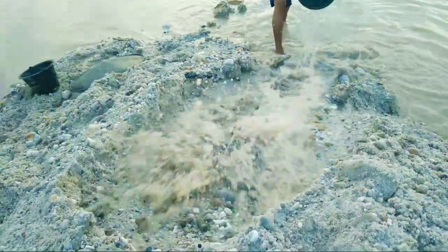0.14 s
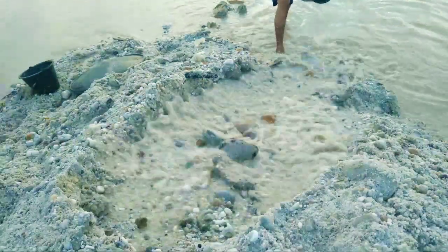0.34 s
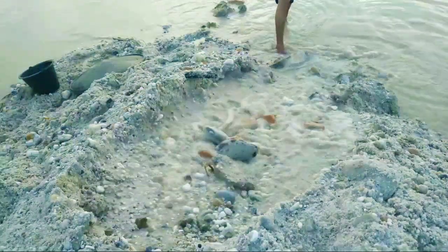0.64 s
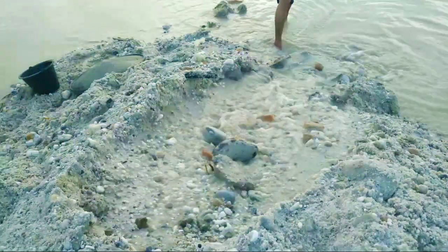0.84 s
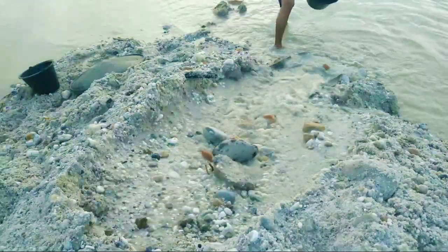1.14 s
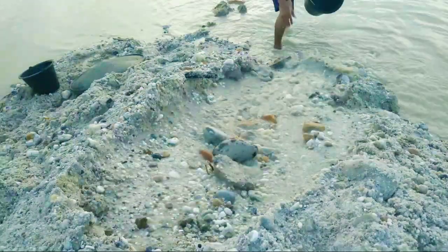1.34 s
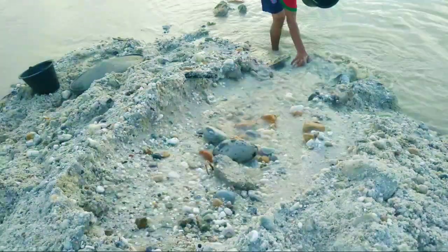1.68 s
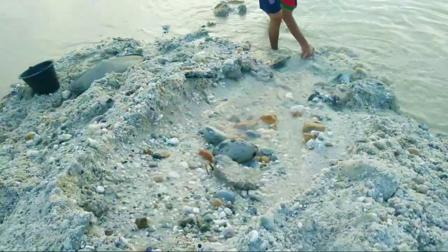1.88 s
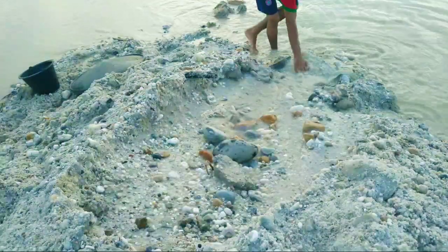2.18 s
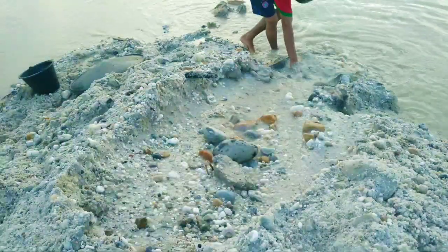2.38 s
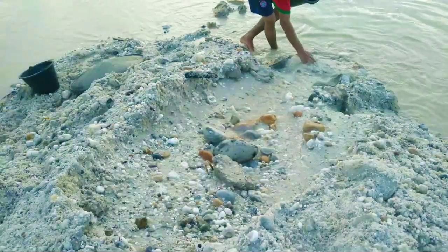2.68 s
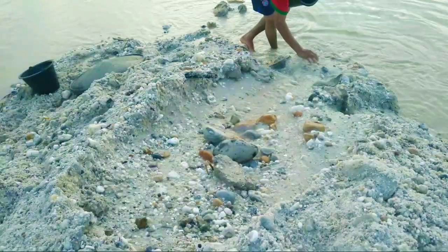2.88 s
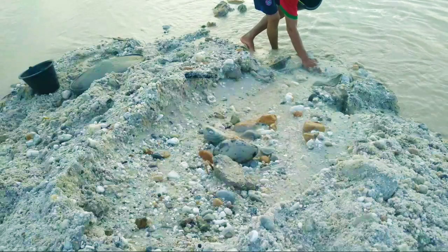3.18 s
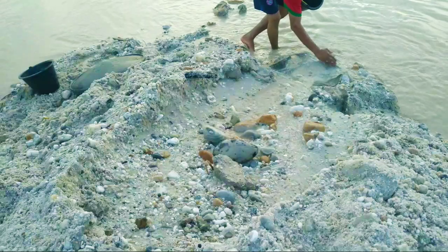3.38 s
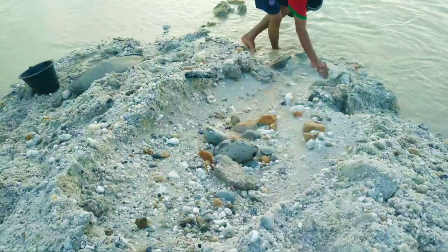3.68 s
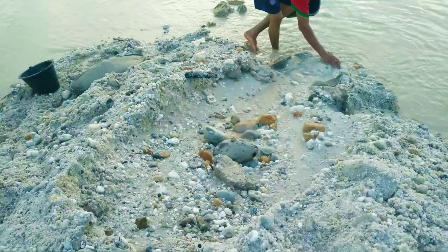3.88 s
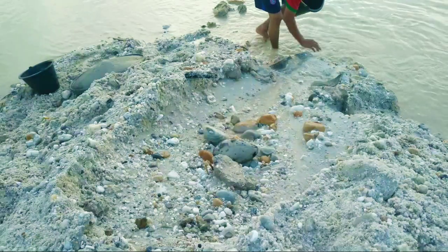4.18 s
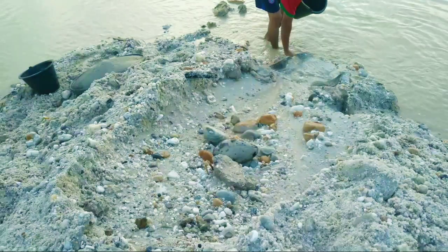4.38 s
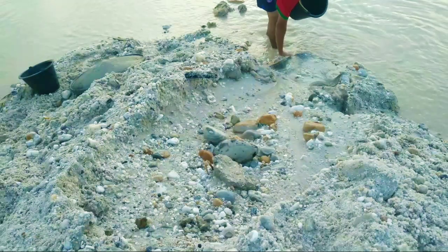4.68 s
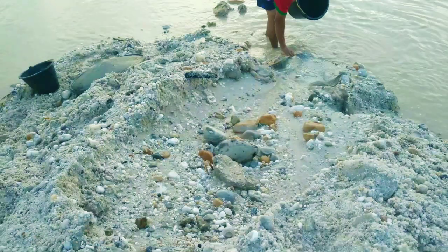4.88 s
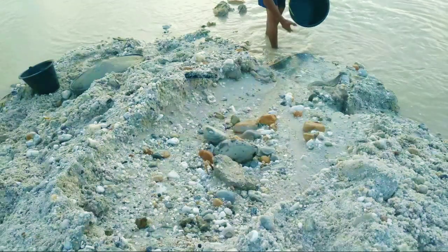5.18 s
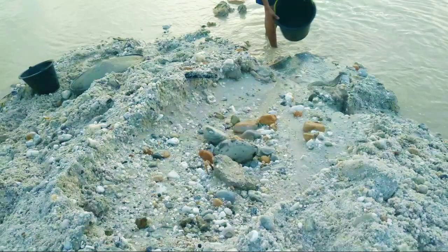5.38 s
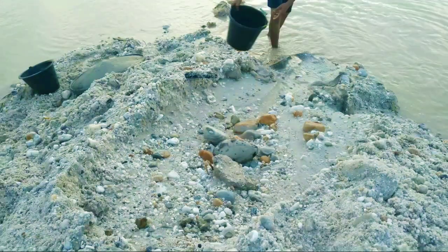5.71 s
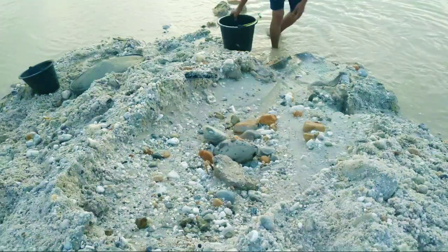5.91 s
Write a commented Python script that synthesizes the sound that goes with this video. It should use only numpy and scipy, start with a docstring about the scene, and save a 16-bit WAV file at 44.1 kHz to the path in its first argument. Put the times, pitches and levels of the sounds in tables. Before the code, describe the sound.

Loud splash on a stony bank, fizzing drainage, bubbling plops and scraped wet grit, a far engine throbbing, then an empty bucket thumping.

```python
"""A bucket of water lands on a gravel bank and drains away: noise bursts, pings and ringing bubbles.
A hand sloshes in the shallows and sweeps wet grit, heard as filtered showers of random impacts.
At the end the empty plastic bucket knocks about, its floor thudding and its wall modes ringing.
Far off, a one-cylinder engine throbs, each firing exciting the exhaust resonances.
Behind all lie open-air rumble, a thin hiss and a high trill, all made from filtered noise."""
import sys
import numpy as np
from scipy import signal
from scipy.fft import rfft, irfft
from scipy.io import wavfile

SR = 44100
rng = np.random.default_rng(int(sys.argv[2]) if len(sys.argv) > 2 else 0)


def to_wav(s):
    """Save 16-bit WAV."""
    ch = np.atleast_2d(s).T  # columns
    pcm = np.round(np.clip(ch, -1, 1) * 32767)  # PCM
    wavfile.write(sys.argv[1], SR, pcm.astype(np.int16))


N = 266804

# Levels are relative; each source sets its own gain. Spectra are (f/Hz, power density level/dB).
# thrown water, the whole sheet and then stray slops: (t/s, spray hold/s, spray level/dB, weight level/dB)
THROWS = [(0, 0.12, -23.3, -23.5), (.014, .003, -32, -28.5), (.072, .02, -36, -33),
          (0.199, 0.0043, -32, -44), (0.274, 0.03, -46, -42)]
# rise time, then the time constants of spray and weight
LAND_S, SPRAY_FALL_S, WEIGHT_FALL_S = 0.0022, 0.06, 0.062
# spectrum of the spray: (f/Hz, level/dB)
SPRAY_SPECTRUM = [(2060, -50), (3500, -24), (4840, -18), (5290, -9.5), (6700, -8), (8470, -3),
                  (11900, -15.5), (14600, -17.5), (15500, -23), (16000, -31.5)]
# spectrum of water slapping stone: (f/Hz, level/dB)
SLAP_SPECTRUM = [(200, -14), (450, -12), (900, -4), (1400, -4), (2200, -6), (3200, -8), (4500, -8),
                 (7000, -41.5)]

# fizz of water draining through the stones: (start t/s, rise/s, hold/s, level/dB, fall time constant/s)
SEEPAGE = (0.15, 0.01, 2.18, -55.5, 0.53)
# trickle back into the shallows: (start t/s, rise/s, hold/s, level/dB, fall time constant/s)
RUNOFF = (0.36, 0.1, 0.3, -59, 1.25)
# legs and hand stir the shallows: (start t/s, rise/s, level/dB, fall time constant/s)
SLOSHES = [(.56, .015, -56, .06), (.875, .015, -55, 0.04), (1.3, 0.14, -41, 0.06),
           (1.555, 0.08, -37.5, 0.08), (1.69, .03, -45, .13), (1.82, .03, -50, .05), (1.94, .02, -51, .06),
           (2.032, 0.038, -52.5, 0.08), (2.47, .02, -60, .12), (2.79, 0.045, -55, 0.062),
           (3.705, 0.029, -56.5, 0.033)]
# spectrum of the fizz: (f/Hz, level/dB)
FIZZ_SPECTRUM = [(1180, -11), (2000, -5), (2440, -8), (4820, -10), (5580, -6.5), (6250, -6.5), (8330, 0.5),
                 (9090, -5), (11300, -10.5), (14900, -19), (16000, -21)]
# spectrum of the lapping: (f/Hz, level/dB)
LAPPING_SPECTRUM = [(250, -12), (470, -3), (650, -4.5), (920, 4), (1300, -4.5), (1900, -6), (3000, -18),
                    (4500, -24)]
# single large bubbles: (t/s, level/dB, f/Hz)
BUBBLES = [(.017, -22, 1000), (.06, -29, 770), (.109, -34, 500), (.206, -32, 940), (.233, -38, 900),
           (.245, -39, 1650), (.246, -40, 500), (.277, -36, 810), (.285, -38, 1050), (.372, -45, 1250),
           (.392, -44, 866), (.455, -44, 1000), (.502, -40, 873), (0.554, -48, 486), (.573, -46, 1610),
           (.79, -43, 1880), (.885, -46, 950), (.912, -47, 800), (1.265, -45, 1260), (1.32, -46, 800),
           (1.337, -46, 1370), (1.356, -40, 824), (1.402, -38, 590), (1.427, -29.5, 885), (1.441, -35, 900),
           (1.456, -38, 1200), (1.484, -38, 1250), (1.572, -41, 920), (1.582, -34, 630), (1.603, -36, 900),
           (1.617, -37, 590), (1.632, -24, 940), (1.654, -34, 710), (1.69, -35, 955), (1.709, -38, 1100),
           (1.749, -39, 900), (1.757, -40, 740), (1.772, -40, 1010), (1.793, -37, 900), (1.81, -41, 700),
           (1.835, -40, 720), (1.85, -37, 799), (1.866, -39, 860), (1.943, -39, 1610), (1.957, -39, 810),
           (2.193, -33, 840), (2.211, -28.5, 904), (2.219, -35, 1080), (2.257, -39, 1065),
           (2.476, -44, 896), (2.686, -40.5, 840), (2.788, -49, 1740), (2.84, -46, 590), (2.87, -50.5, 876),
           (2.922, -51, 1090), (3.013, -49, 1600), (3.397, -35.5, 2330), (3.724, -47, 610),
           (3.748, -51, 660), (3.745, -50, 1450), (3.847, -45, 1300), (3.854, -40, 1980), (3.92, -45, 2300),
           (4.32, -56.5, 1190), (5.908, -42, 1780), (5.922, -45, 800)]
BUBBLE_CYCLES = 40  # a large bubble's decay reaches -60 dB in this many cycles of its starting pitch

# sweeps through wet grit: (t/s, level/dB, rise/s, fall time constant/s,
# wet body level/dB and coarse sand level/dB, both relative to the fine grit)
SWEEPS = [(.314, -43.5, .013, 0.014, -22, 5.5), (1.448, -43.5, .015, 0.047, -2.5, 4),
          (1.629, -43, 0.0037, 0.014, 0, 0.5), (1.705, -51, .005, 0.074, 2, 2.5),
          (1.817, -46.5, 0.0099, 0.012, -32, 5.5), (1.923, -54, .004, 0.013, 3.5, 8),
          (2.028, -36.3, 0.007, 0.038, -25, -24), (2.496, -58, 0.0084, 0.0071, -25, 8),
          (2.732, -51.5, 0.0031, 0.047, -13, -9), (2.806, -56, 0.022, 0.018, -11, 12.5),
          (2.983, -58, 0.011, 0.037, -2.5, 0), (3.241, -50, .003, .044, -35, -5),
          (3.328, -61.5, 0.0076, 0.03, 4, 3), (3.351, -43.5, .015, 0.022, -9.5, 1.5),
          (3.389, -40, 0.0044, 0.039, -18, -4), (3.648, -57.5, 0.0067, 0.022, -12, -5),
          (3.709, -71.5, 0.023, 0.053, 11, -4), (3.8, -60, .005, .03, 0, 0),
          (3.829, -42, 0.03, 0.045, -13, -2), (3.882, -43, 0.011, 0.045, -29, -5),
          (4.159, -61.5, 0.0036, 0.033, -2, -1), (4.519, -58.5, .006, .02, -13, 3),
          (4.54, -43.5, .008, 0.032, -17, -16), (5.537, -65, 0.012, 0.016, 11, 1),
          (5.69, -50, .025, .025, -22, -12), (5.783, -44, 0.0045, 0.05, -6.5, -6.5),
          (5.904, -59, .004, 0.024, 7, -23), (5.929, -43, 0.012, 0.045, -13, -11)]
# spectrum of fine grit: (f/Hz, level/dB)
GRIT_SPECTRUM = [(1500, -34), (3000, -19.5), (4500, -15), (5800, -7), (7200, -1), (8500, 10.5),
                 (9700, -3.5), (12000, -14.5), (16000, -25)]
# spectrum of coarse sand: (f/Hz, level/dB)
SAND_SPECTRUM = [(2500, -32), (4600, -13.5), (5400, 0.5), (6500, -1.5), (7500, 3), (9500, -37.5)]
# spectrum of water among the grains: (f/Hz, level/dB)
WET_SPECTRUM = [(300, -30.5), (600, -3.5), (1100, -1), (1700, -0.5), (2400, 1), (3800, -5.5), (6000, -20)]
# sharp ticks of pebbles, heavy drops and, at the end, the bucket:
# (t/s, level/dB, low crack level/dB relative to the tick, ring f/Hz)
CLICKS = [(0.0165, -12, 5, 2900), (0.023, -13, -1, 5500), (.045, -19, -5, 2400), (.0615, -13, -12, 7000),
          (0.1372, -6, -20, 5800), (.1865, -14, -18, 7400), (.206, -23, 0, 5200), (0.264, -22, -25, 6900),
          (.328, -28, -25, 6600), (.354, -28, -22, 9500), (.29, -31, -4, 4300), (.528, -34, -7.5, 8000),
          (.873, -38, -15, 8000), (1.4544, -27, -20, 7000), (1.4753, -29, -8, 6200), (1.488, -30, -6, 7000),
          (1.606, -36, 4, 5000), (1.6315, -25, 0, 6300), (1.686, -32, -15, 7800), (1.71, -29, -15, 7500),
          (1.821, -30, -25, 7000), (2.0355, -25, -30, 8800), (2.089, -30, -25, 8800),
          (2.229, -33, -21, 8200), (2.311, -35, -24, 7000), (2.392, -40, -26, 8000),
          (2.478, -38, -12, 6000), (2.504, -36, -20, 5800), (2.733, -34, -15, 8500),
          (2.743, -37, -20, 9000), (2.811, -34, -10, 6000), (2.831, -30, -25, 6300),
          (2.861, -37, -20, 7200), (2.987, -40, -12, 4660), (3.0225, -25, -26, 8500),
          (3.2435, -28, -30, 8300), (3.316, -38, -20, 8200), (3.364, -29, -10, 5800),
          (3.395, -26, -25, 7300), (3.403, -24, -25, 6800), (3.442, -31, -22, 8400),
          (3.482, -36, -22, 8300), (3.536, -41, -20, 8600), (3.652, -46, -15, 8200), (3.85, -23, -18, 7200),
          (3.899, -25, -25, 9000), (3.936, -28, -22, 7600), (4.132, -49, -12, 7500), (4.52, -44, -12, 6500),
          (4.545, -33, -20, 7800), (4.743, -44.5, -15, 8000), (5.646, -16, -12, 8300),
          (5.737, -19, -20, 9200), (5.794, -30, -25, 8500), (5.831, -28, -20, 8400),
          (5.937, -28, -25, 9000), (5.948, -25, -15, 6000), (5.98, -30, -25, 8600)]

# bucket knocks: (t/s, thud level/dB, thud f/Hz, wall ring level/dB, favoured wall f/Hz, crack level/dB)
KNOCKS = [(5.541, -62, 330, -41, 1300, -66), (5.553, -60, 330, -41, 1300, -66),
          (5.635, -22, 410, -19, 1100, -33), (5.6365, -40, 400, -17, 2050, -33),
          (5.6395, -18, 340, -24, 900, -40), (5.646, -30, 310, -19, 3600, -30),
          (5.648, -27, 300, -16, 1000, -36), (5.654, -26, 300, -19, 1100, -42),
          (5.7286, -10, 352, -15, 2050, -42), (5.7295, -40, 350, -16, 1200, -44),
          (5.7387, -10.5, 342, -12.5, 1330, -35), (5.7493, -19, 335, -18, 1400, -34),
          (5.753, -35, 335, -21, 1400, -37), (5.7597, -17, 315, -15, 1850, -35),
          (5.7629, -14.5, 315, -32, 1240, -37), (5.776, -34, 300, -38, 1240, -43),
          (5.79, -30, 283, -42, 700, -50), (5.815, -38, 300, -36, 1450, -55),
          (5.826, -33, 310, -39, 1400, -55), (5.852, -38, 347, -44, 1400, -62)]
# wall modes of the bucket: (f/Hz, level/dB, t60/s)
WALL_MODES = [(505, -10, .05), (634, -15, .05), (710, -12, 0.053), (877, -11, .05), (1040, -6, 0.04),
              (1240, -9, 0.043), (1325, -7, .035), (1445, -8, 0.04), (1600, -10, 0.024), (1860, -9, .022),
              (2050, -7, 0.022), (2850, -13, 0.02), (3250, -16, .02), (3600, -14, .022), (4200, -19, .022)]
# spectrum of grit against the bucket: (f/Hz, level/dB)
CRACK_SPECTRUM = [(200, -6), (600, 0), (1400, 3), (2400, -3), (3200, -1), (4000, 0), (6000, -6), (8500, 2),
                  (10500, -8.5), (16000, -24)]
# spectrum of the hollow's shudder: (f/Hz, level/dB)
HOLLOW_SPECTRUM = [(120, -25), (220, -17), (295, 0), (370, -8), (520, -24.5), (1200, -43), (3000, -56.5)]
# the wire handle clinks in its lugs: (t/s, level/dB, f/Hz)
HANDLE_CLINKS = [(5.744, -40, 5600), (5.7445, -36, 3950), (5.758, -40, 3950), (5.7665, -30, 4830),
                 (5.7825, -40, 3970)]

# engine speed: (t/s, firings per s)
ENGINE_SPEED = [(0.0, 24.59), (0.09, 26.73), (0.439, 19.64), (0.802, 24.72), (1.042, 20.66), (1.315, 15.38),
                (1.836, 18.24), (2.026, 21.79), (2.339, 17.0), (2.497, 22.49), (2.685, 26.0),
                (2.974, 19.26), (3.261, 28.35), (3.556, 20.57), (3.794, 16.79), (4.075, 24.84),
                (4.388, 26.07), (5.071, 23.59), (5.261, 19.59), (6.05, 14.25)]
# the throttle opens: (start t/s, length/s, boom level/dB, its change/(dB/s),
# bark level/dB relative to the boom, its change/(dB/s), closing time constant/s)
SURGES = [(-.04, 0.29, -39, -6, -8, -12, .05), (0.462, 0.18, -36.5, 22, -12.5, 0, .05),
          (0.673, 0.24, -35.5, -21, -12, 0, .05), (1.437, 0.63, -42, 5.5, -11, 6, .04),
          (2.344, 0.2, -38, 15, -11, 0, .045), (2.586, 0.2, -35, -16, -9, 14, .05),
          (2.979, .12, -39, 55, -13, -10, .04), (3.11, 0.16, -34.5, -36, -11, 35, .085),
          (3.775, .13, -37, 16, -12, 10, .04), (3.93, .48, -42, 9, -9.5, -2, .05),
          (4.397, 0.71, -37.7, -14, -9, -5, .04), (5.186, 0.07, -41, 0, -10, 0, .05),
          (5.5, .05, -45, 0, -15, 0, .04)]
# deep exhaust resonances: (f/Hz at cruising speed, level/dB, t60/s, rise time constant/s)
BOOM_MODES = [(55, -28, 0.27, 0.023), (121, -5, 0.028, 0.0036), (149.9, -2.4, 0.185, 0.0055)]
# exhaust resonances that load brings out: (f/Hz at cruising speed, level/dB, t60/s, rise time constant/s)
BARK_MODES = [(265.7, 0, 0.055, 0.0042), (292.3, 4.5, 0.066, 0.011), (380, -17, 0.059, 0.003)]
# spectrum of rough flow from the exhaust: (f/Hz, level/dB)
FLOW_SPECTRUM = [(20, -27), (38, -20), (54, -2), (75, -16), (120, -16), (200, -7), (300, -8), (400, -20),
                 (800, -59)]
# the hum drifts between the ears: (t/s, left minus right level/dB, left delay/ms)
ENGINE_PAN = [(0, 1, -.1), (1.5, -4.5, -.13), (1.95, 2.5, -.13), (3.6, .5, -.1), (4.45, 5, .38),
              (5.3, -1, .36), (6.05, 0, 0)]
IDLE_DB, IDLE_BARK_DB = -51.5, -14.5  # boom with the throttle shut, and the bark relative to it
IDLE_PER_S, COAST_DB = 18.9, 0.58  # reference speed; boom change in dB per (firing per s) away from it
OPEN_S = 0.041  # rise time of a throttle opening
FIRST_TURN = .713  # part of the firing cycle already past at the start

# spectrum of the thin hiss: (f/Hz, level/dB)
HISS_SPECTRUM = [(260, -38.5), (450, -0.5), (515, -19.5), (694, -9.5), (1220, -14.5), (1340, -8.5),
                 (2360, -13), (2660, -7.5), (3490, -16.5), (4490, -15.5), (7140, -16), (8170, -2),
                 (9070, -14), (14800, -23.5), (16000, -27)]
AIR_DB = -66.5
# spectrum of the steady rumble: (f/Hz, level/dB)
RUMBLE_SPECTRUM = [(15, -38), (50, -2), (80, -.5), (140, 10), (200, -6), (320, -11), (500, -24), (900, -42)]
# brief swells of deep rumble: (peak t/s, width/s, level/dB)
RUMBLE_SWELLS = [(.1, .025, -55), (.68, .025, -58), (.89, .02, -56), (1.79, .025, -59), (2.46, .045, -52),
                 (2.63, .03, -55), (3.04, .025, -58), (3.18, .045, -49), (4.01, .03, -54), (4.42, .04, -48),
                 (5.67, .03, -53)]
# spectrum of those swells: (f/Hz, level/dB)
DEEP_SPECTRUM = [(25, -38), (42, -12), (54, 0), (68, -6), (100, -18), (250, -55)]
# correlation of left and right: (f/Hz, likeness)
LIKENESS = [(50, 0.8), (300, 0.78), (700, 0.8), (1400, 0.7), (2500, 0.38), (5000, 0.22), (16000, 0.084)]
EDGE_HZ = 15800


def throw(spray_db=0.2, slap_db=-4.5, bubbles_db=-6, pings_db=-7, patter_db=-7.5):
    """Impact noise: the sheet slaps the stones and breaks into spray; drops ping and patter on pebbles."""
    # unrelated bursts add in power
    spray = np.sqrt(sum(swell(s, LAND_S, hold, db, SPRAY_FALL_S) ** 2 for s, hold, db, _ in THROWS))
    weight = np.sqrt(sum(swell(s, LAND_S, 0, db, WEIGHT_FALL_S) ** 2 for s, _, _, db in THROWS))
    drops = amp(spray_db) * crackle(per_s=3000, spread_db=0.3, fall_s=0.0004, wash=0.1)
    drops = drops + amp(pings_db) * droplets(per_s=600, cycles=25, low_hz=3500)
    slap = amp(slap_db) * colour(crackle(per_s=500, spread_db=1.5, fall_s=.0006, wash=0.08), SLAP_SPECTRUM)
    patter = amp(patter_db) * droplets(per_s=500, cycles=24, low_hz=1300)
    bubbles = burble(per_s=500, cycles=24, glide=0.076)
    froth = amp(bubbles_db) * evened(colour(bubbles, SLAP_SPECTRUM))
    splash = ports(spray * colour(drops, SPRAY_SPECTRUM) + weight * (slap + patter))
    return (splash + weight * froth) * amp([[-.8], [.8]])


def shallows(fizz_db=2.6, bubbles_db=-3.5, wash_db=-8, stirred_fizz_db=-14):
    """Flow noise and bubble resonance: water fizzes through gravel and laps round the legs and hand."""
    stirred = stirring()
    seeping = np.hypot(swell(*SEEPAGE), amp(stirred_fizz_db) * stirred)
    motion = np.hypot(swell(*RUNOFF), stirred)
    fizz_grains = crackle(per_s=650, spread_db=1.5, fall_s=0.00031, wash=1.0)
    fizz = amp(fizz_db) * seeping * colour(fizz_grains, FIZZ_SPECTRUM)
    wash_grains = crackle(per_s=420, spread_db=0.5, fall_s=0.006, wash=0.41)
    wash = amp(wash_db) * colour(wash_grains, LAPPING_SPECTRUM)
    bubbles = burble(per_s=420, cycles=42, glide=0.26)
    froth = amp(bubbles_db) * evened(colour(bubbles, LAPPING_SPECTRUM))
    return (ports(fizz + motion * wash) + motion * froth) * amp([[.5], [-.5]])


def stirring():
    """Amplitude modulation: how hard legs and hand move the shallows, as a gain."""
    return sum(swell(s, rise, 0, db, fall) for s, rise, db, fall in SLOSHES)


def drips(drip_db=-12, click_db=-11.5):
    """Bubble resonance and impact: small bubbles and drops break out wherever the water moves."""
    motion = np.hypot(swell(*RUNOFF), stirring())
    plinks = amp(drip_db) * evened(colour(burble(per_s=130, cycles=22, glide=0.24), WET_SPECTRUM))
    drops = crackle(per_s=130, spread_db=3, fall_s=0.0005, wash=0)
    ticks = amp(click_db) * ports(colour(drops, WET_SPECTRUM))
    return motion * (plinks + ticks)


def plops(glide=0.29):
    """Bubble resonance: large bubbles heard one by one; the higher the pitch, the shorter the ring."""
    out = np.zeros(N)
    for s, db, hz in BUBBLES:
        add(out, s, amp(db) * bubble(hz, BUBBLE_CYCLES / hz, glide))
    return out * amp([[.5], [-.5]])


def sweeps(grit_db=1.6, sand_db=-.7, wet_db=.5, settle_db=-22, settle_s=0.12, pings_db=-8, plinks_db=-6):
    """Granular friction: a hand pushes wet grit in showers of grains and drops; loose grains then settle."""
    grit, sand, wet, loose = np.zeros((4, N))
    t = seconds(count=14000)
    for s, db, rise, fall, body_db, coarse_db in SWEEPS:
        stroke = amp(db) * np.minimum(t / rise, 1) * np.exp(-np.maximum(t - rise, 0) / fall)
        add(grit, s, stroke)
        add(sand, s, amp(coarse_db) * stroke)
        add(wet, s, amp(body_db) * stroke)
        add(loose, s + rise, amp(db + settle_db) * np.exp(-t / settle_s))
    fine = colour(grit * crackle(per_s=870, spread_db=3, fall_s=0.0008, wash=0.4), GRIT_SPECTRUM)
    coarse = colour(sand * crackle(per_s=550, spread_db=.3, fall_s=0.0006, wash=0.11), SAND_SPECTRUM)
    ping_tone = evened(colour(droplets(per_s=300, cycles=40, low_hz=3500), SPRAY_SPECTRUM))
    pings = amp(pings_db) * np.hypot(grit, sand) * ping_tone
    water = colour(wet * crackle(per_s=300, spread_db=2.5, fall_s=0.0012, wash=0.15), WET_SPECTRUM)
    plink_tone = evened(colour(droplets(per_s=200, cycles=28, low_hz=900), WET_SPECTRUM))
    plinks = amp(plinks_db) * wet * plink_tone
    settling = loose * colour(crackle(per_s=300, spread_db=2, fall_s=.0007, wash=.2), GRIT_SPECTRUM)
    showers = amp(grit_db) * fine + amp(sand_db) * coarse + amp(wet_db) * water
    return ports(showers + pings + plinks + settling) * amp([[.7], [-.7]])


def clicks(fall_s=0.0006, click_db=-5, snap_db=4, ring_db=-6.5, ring_cycles=30):
    """Impact excitation: sharp ticks of pebbles, heavy drops and, at the end, the bucket;
    each is a snap, a short scatter and a ping."""
    tick, crack, ping = np.zeros((3, 2, N))
    t = seconds(count=600)
    for s, db, low_db, hz in CLICKS:
        scatter = np.exp(-t / fall_s) * rng.standard_normal((2, len(t)))
        snap = amp(snap_db) * (t == 0)
        burst = amp(db + click_db) * (scatter + snap)
        add(tick, s, burst)
        add(crack, s, amp(low_db) * burst)
        decay = amp(db + ring_db - 60 * t * hz / ring_cycles)
        add(ping, s, decay * np.sin(2 * np.pi * (hz * t + rng.random((2, 1)))))
    return ports(colour(tick, GRIT_SPECTRUM) + colour(crack, WET_SPECTRUM) + ping)


def bucket(thud_s=0.0038, flex_s=.0006, crack_s=0.007, tail_db=-19, tail_s=0.058, wall_db=-2.3,
           grit_db=1, hollow_db=-20, hollow_s=0.043, focus_octaves=.22, other_modes=.28):
    """Modal vibration: the floor thuds, the wall flexes and rings, grit rattles, the hollow shudders on."""
    body, shudder_power, grit_power = np.zeros((3, N))
    t = seconds(count=12000)
    u = t / thud_s
    for s, db, thud_hz, ring_db, focus_hz, crack_db in KNOCKS:
        thud = u * np.exp((1 - u ** 2) / 2) * np.sin(2 * np.pi * thud_hz * t)
        # each blow lands on another spot and favours the modes near one pitch
        octaves_away = np.log2(np.transpose(WALL_MODES)[0] / focus_hz)
        near = np.exp(-(octaves_away / focus_octaves) ** 2)
        shares = rng.choice([-1, 1], len(WALL_MODES)) * np.maximum(near, other_modes)
        wall = sum(share * amp(mode_db - 60 * t / t60) * np.sin(2 * np.pi * hz * t)
                   for share, (hz, mode_db, t60) in zip(shares, WALL_MODES))
        ring = amp(ring_db + wall_db) * (1 - np.exp(-t / flex_s)) * wall
        add(body, s, amp(db) * thud + ring)
        # the noise envelopes of successive knocks add in power
        add(shudder_power, s, (amp(db + hollow_db) * np.exp(-t / hollow_s)) ** 2)
        scrape = np.exp(-t / crack_s) + amp(tail_db) * np.exp(-t / tail_s)
        add(grit_power, s, (amp(crack_db + grit_db) * scrape) ** 2)
    hollow = colour(np.sqrt(shudder_power) * rng.standard_normal((2, N)), HOLLOW_SPECTRUM)
    grains = crackle(per_s=1200, spread_db=1, fall_s=.0005, wash=.4)
    rattle = colour(np.sqrt(grit_power) * grains, CRACK_SPECTRUM)
    return (body + ports(rattle + hollow)) * amp([[-1], [1]])


def handle(t60=.028):
    """Damped free vibration: short, separate clinks of the bucket's wire handle."""
    out, t = np.zeros(N), seconds(count=2500)
    for s, db, hz in HANDLE_CLINKS:
        add(out, s, amp(db - 60 * t / t60) * np.sin(2 * np.pi * hz * t))
    return out * amp([[-1], [1]])


def engine(boom_db=0, bark_db=0, uneven_db=1.1, heat=0.16, waver=0.016, flow_db=-25, puff_s=.012,
           cruise_per_s=22.4, far_hz=470):
    """Pulse-excited resonance: each firing rings the exhaust, higher as the gas runs faster and hotter,
    and blows a puff of rough flow; distance leaves only the lows."""
    t, out, puffs = seconds(N), np.zeros(N), np.zeros(N)
    speed = np.interp(t, *np.transpose(ENGINE_SPEED))
    boom_gain, bark_gain = throttle(speed)
    turns = np.cumsum(speed) / SR + FIRST_TURN
    fired = np.flatnonzero(np.diff(np.floor(turns)))
    flow = rng.standard_normal((1, N))
    # random boom level, bark level, common pitch and bark pitch of each firing
    for i, (a, b, c, d) in zip(fired, rng.standard_normal((len(fired), 4))):
        stretch = (speed[i] / cruise_per_s) ** heat * (1 + waver * c)
        boom = boom_gain[i] * amp(boom_db + uneven_db * a) * exhaust(BOOM_MODES, stretch)
        bark_ring = exhaust(BARK_MODES, stretch * (1 + waver * d))
        bark = bark_gain[i] * amp(bark_db + 2 * uneven_db * b) * bark_ring
        add(out, t[i], boom - bark)
        add(puffs, t[i], boom_gain[i] * np.exp(-seconds(count=3000) / puff_s))
    out = out + amp(flow_db) * colour(puffs * flow, FLOW_SPECTRUM)[0]
    distance_loss = np.hypot(1, (np.fft.rfftfreq(N, 1 / SR) / far_hz) ** 6)
    out = irfft(rfft(out) / distance_loss, N)
    at, pan_db, late_ms = np.transpose(ENGINE_PAN)
    left = np.interp(t - np.interp(t, at, late_ms) / 1000, t, out)
    return np.array([left, out]) * amp(np.outer([.5, -.5], np.interp(t, at, pan_db)))


def throttle(speed):
    """Load dependence: gains of boom and bark; the engine coasts, quieter as it slows, unless a surge lifts it."""
    t = seconds(N)
    boom = amp(IDLE_DB + COAST_DB * (speed - IDLE_PER_S))
    bark = amp(IDLE_BARK_DB) * boom
    for start, length, db, db_per_s, bark_db, bark_db_per_s, close_s in SURGES:
        opened = np.clip(t - start, 0, length)
        surge = swell(start, OPEN_S, length - OPEN_S, db, close_s) * amp(db_per_s * opened)
        boom = np.maximum(boom, surge)
        bark = np.maximum(bark, amp(bark_db + bark_db_per_s * opened) * surge)
    return boom, bark


def exhaust(modes, stretch):
    """Modal superposition: the ring of one firing, its pitch multiplied by stretch."""
    t = seconds(count=8000)
    ring = sum(amp(db - 60 * t / t60) * (1 - np.exp(-t / rise)) ** 2 * np.sin(2 * np.pi * hz * stretch * t)
               for hz, db, t60, rise in modes)
    return ring / np.std(ring[:1600])


def air(rumble_db=-57.5, hiss_db=-1.2):
    """Broadband noise: faint open-air rumble that swells now and then, and a thin hiss."""
    hiss, rumble, deep = rng.standard_normal((3, 2, N))
    t = seconds(N)
    swells = sum(amp(db) * np.exp(-((t - s) / width) ** 2 / 2) for s, width, db in RUMBLE_SWELLS)
    hiss = amp(AIR_DB + hiss_db) * colour(hiss, HISS_SPECTRUM)
    rumble = amp(rumble_db) * colour(rumble, RUMBLE_SPECTRUM)
    return ports(hiss + rumble + swells * colour(deep, DEEP_SPECTRUM))


def trill(trill_db=-73, centre_hz=8150, sweep_hz=260, per_s=13, width_hz=160, count=3):
    """Frequency modulation: narrow noise bands waver at their own pace, a high trill like distant insects."""
    t, out = seconds(N), np.zeros((2, N))
    r = np.exp(-np.pi * width_hz / SR)
    for pace, start in rng.uniform([.75, 0], [1.25, 1], (count, 2)):
        sway = np.sin(2 * np.pi * (per_s * pace * t + start))
        noise = rng.standard_normal((2, N)) + 1j * rng.standard_normal((2, N))
        fuzz = signal.sosfilt([[1 - r, 0, 0, 1, -r, 0]] * 2, noise)
        cycles = np.cumsum(centre_hz + sweep_hz * sway) / SR
        out += (fuzz * np.exp(2j * np.pi * cycles)).real
    return amp(trill_db) * ports(evened(out))


def crackle(per_s, spread_db, fall_s, wash):
    """Shot noise: each impact is a tiny burst of noise, over a steady wash."""
    power = signal.lfilter([1], [1, -np.exp(-1 / (fall_s * SR))], impacts(per_s, spread_db) ** 2)
    envelope = np.sqrt(power / power.mean() + abs(wash))
    return evened(envelope * rng.standard_normal((2, N)))


def droplets(per_s, cycles, low_hz):
    """Damped resonance: drops and grains each ping at a pitch within two octaves above low_hz."""
    out, t = np.zeros((2, N)), seconds(count=400)
    sizes = impacts(per_s, 4)
    pitch, phase = rng.random(N), rng.random((2, N))
    for i in np.flatnonzero(sizes):
        hz = low_hz * 2 ** (2 * pitch[i])
        ping = amp(-60 * t * hz / cycles) * np.sin(2 * np.pi * (hz * t + phase[:, i, None]))
        add(out, i / SR, sizes[i] * ping)
    return evened(out)


def burble(per_s, cycles, glide):
    """Superposed bubble resonances: a crowd of all sizes, each reaching the right channel up to 0.3 ms late."""
    out = np.zeros((2, N))
    sizes = impacts(per_s, 3)
    pitch, side, sign = rng.random((3, N))
    for i in np.flatnonzero(sizes):
        hz = 400 * 10 ** pitch[i]
        ring = np.sign(sign[i] - .5) * sizes[i] * hz * bubble(hz, cycles / hz, glide)
        add(out[0], i / SR, ring)
        add(out[1], i / SR + .0003 * side[i], ring)
    return evened(out)


def bubble(hz, t60, glide):
    """Volume pulsation: a bubble rings and rises in pitch as it nears the surface."""
    t = seconds(count=4000)
    cycles = hz * (t + glide * t * t / t60 / 2)
    return (1 - np.exp(-t / .0008)) * amp(-60 * t / t60) * np.sin(2 * np.pi * cycles)


def impacts(per_s, spread_db):
    """Poisson-like process: random impacts, many small, a few large."""
    return amp(spread_db * np.minimum(rng.exponential(1, N), 4)) * (rng.random(N) < per_s / SR)


def swell(start, rise, hold, db, fall):
    """Exponential decay: a gain that rises, holds at db and dies away with the time constant fall."""
    t = seconds(N) - start
    return amp(db) * np.clip(t / rise, 0, 1) * np.exp(-np.maximum(t - rise - hold, 0) / fall)


def colour(x, spectrum):
    """Minimum-phase filtering: a causal filter of unit energy with the given spectrum."""
    level_db = np.maximum(read(spectrum, abs(np.fft.fftfreq(4096, 1 / SR))), -100)
    log_gain = np.log(amp(level_db))
    # the Hilbert transform of the log gain gives the phase
    taps = np.fft.ifft(np.exp(np.conj(signal.hilbert(log_gain)))).real[:2048]
    return signal.oaconvolve(x, taps[None] / np.linalg.norm(taps), axes=1)[:, :N]


def ports(x):
    """Interchannel coherence: unrelated channels become alike in the bass, the left a little earlier."""
    left, right = rfft(x)
    hz = np.fft.rfftfreq(N, 1 / SR)
    same = np.clip(read(LIKENESS, hz), -1, 1)
    delay = np.exp(-2j * np.pi * hz * .00012)  # 0.12 ms
    return irfft([left, delay * (same * left + np.sqrt(1 - same ** 2) * right)], N)


def add(mix, s, sound):
    """Linear superposition: mixes a sound in at time s."""
    part = mix[..., max(round(s * SR), 0):][..., :sound.shape[-1]]
    part += sound[..., :part.shape[-1]]


def read(points, hz):
    """Interpolation on a log-frequency axis."""
    f, value = np.transpose(points)
    return np.interp(np.log(hz + 1), np.log(f + 1), value)


def amp(db):
    """Level law: decibels to amplitude gain."""
    return 10 ** (np.asarray(db) / 20)


def evened(x):
    """Power normalisation: scales to rms 1."""
    return x / np.sqrt(np.mean(x ** 2) + 1e-20)


def seconds(count):
    """Uniform sampling: a time axis of count samples."""
    return np.arange(count) / SR


def scene():
    """Linear superposition: all sources in the open air."""
    water = throw() + shallows() + drips() + plops()
    gravel_and_bucket = sweeps() + clicks() + bucket() + handle()
    return water + gravel_and_bucket + engine() + air() + trill()


def record(dry):
    """Band limitation: a linear-phase low-pass at EDGE_HZ."""
    taps = signal.firwin(401, EDGE_HZ, window=("kaiser", 8), fs=SR)
    return signal.oaconvolve(dry, taps[None], "same")


dry = scene()
out = record(dry)
to_wav(out)
```